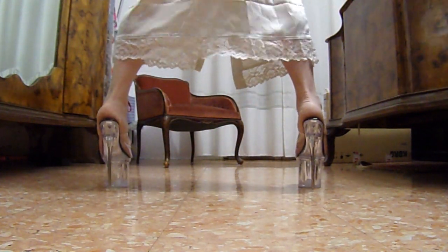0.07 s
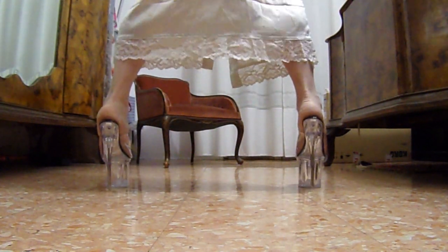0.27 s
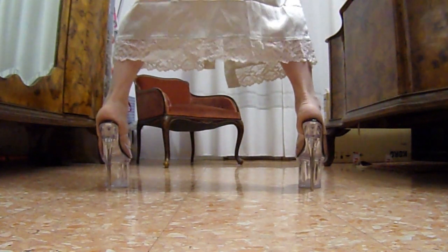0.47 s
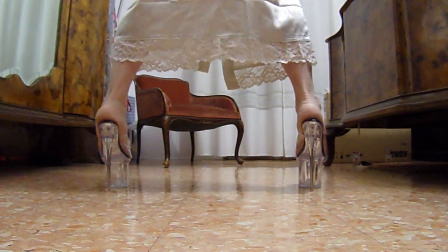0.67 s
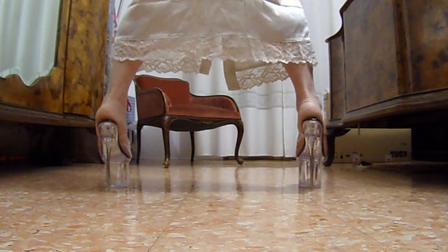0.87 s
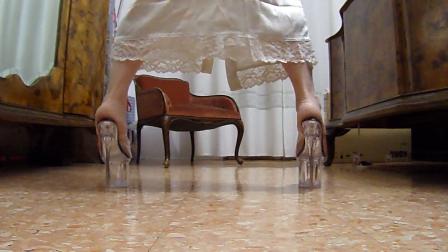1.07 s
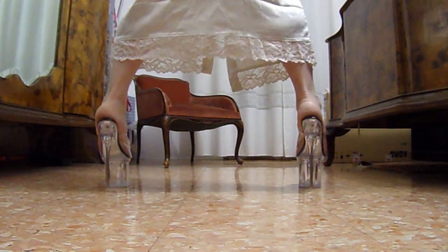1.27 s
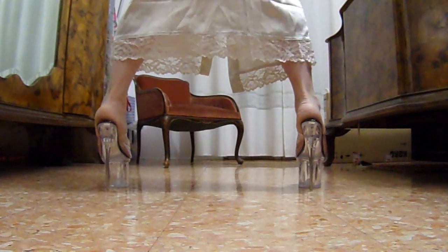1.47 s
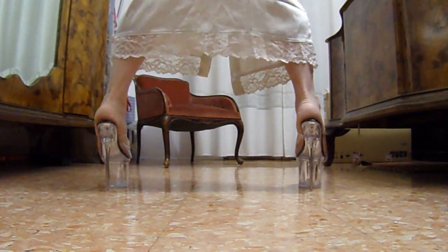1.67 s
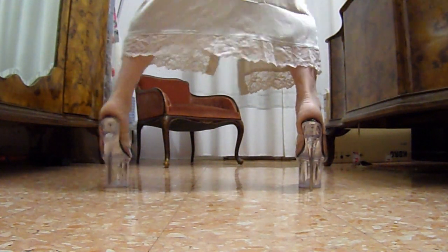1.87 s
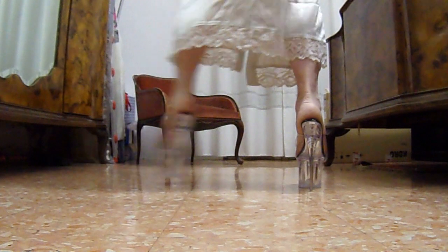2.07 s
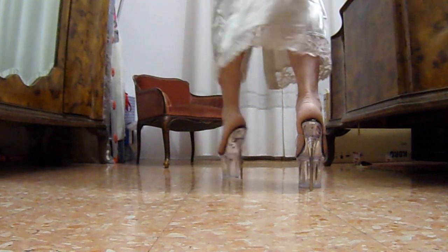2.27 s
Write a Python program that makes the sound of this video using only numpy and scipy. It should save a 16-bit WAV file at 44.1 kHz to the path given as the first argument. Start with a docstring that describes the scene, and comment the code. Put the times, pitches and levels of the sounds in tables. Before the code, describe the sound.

Quick doubled clacks of high heels on hard stone indoors, ending with a faint scuff and ticks

```python
"""A quiet room hiss, shaped noise, runs throughout. From the start two hard high heels tap a polished stone
floor in a small furnished bedroom, mostly in near-coincident pairs. Each tap sums a dull floor knock and short
heel ring (decaying sines), a noise crack, a few echo slaps and a brief boxy tail of noise and room tones.
Small ticks (double rings) sound among the taps; after the last tap one shoe slides (random grains) and
settles softly with more ticks."""
import sys
import numpy as np
from scipy import signal
from scipy.fft import rfft, irfft
from scipy.io import wavfile

SR = 44100
rng = np.random.default_rng(int(sys.argv[2]) if len(sys.argv) > 2 else 0)


def bounce(signal):
    """Save signal as a 16-bit WAV file at the path given by the first command-line argument."""
    frames = np.transpose(np.atleast_2d(signal))
    limited = np.clip(frames, -1, 1)
    pcm = np.round(limited * 32767).astype(np.int16)
    wavfile.write(sys.argv[1], SR, pcm)


N = 102753

# Microphone hiss. Each row: frequency in Hz, density in dB per Hz.
HISS_HZ_DB = [(25, -97), (80, -84), (150, -86.5), (300, -89.5), (600, -94), (1000, -99), (2000, -104),
              (4000, -108), (5000, -112), (7000, -115), (8000, -123), (9000, -116), (11800, -120),
              (13000, -117), (15500, -125)]
MIC_LOW_CUT_HZ, MIC_TOP_CUT_HZ = 130, 16400

# Taps of the brighter heel. Each row: time in seconds, level in dB, hardness as treble gain in dB.
BRIGHT_TAPS_S_DB_DB = [(-.0068, 4.5, 1), (.2171, 4.5, -1.5), (.3992, 0.5, 0.5), (.572, 0, -0.5),
                       (.7439, 0.16, -2), (.9103, 0, -1.5), (1.0413, -10.5, -17), (1.2344, 0.65, -3),
                       (1.4395, 0.4, -1.5), (1.6335, -1.8, -2)]
# Taps of the duller heel. Each row: time in seconds, level in dB, hardness as treble gain in dB.
DULL_TAPS_S_DB_DB = [(-.01, -24, -6), (.2182, -2, 2.5), (.3945, -0.4, -2.5), (.6032, -1, -2),
                     (.7303, -7.5, -3), (.8933, -5, -6.5), (1.2484, 0, -2), (1.4312, -6, -2),
                     (1.6404, -1, -4)]
HARDNESS_HZ = 1300
LEAD_S = 0.02  # headroom for taps that begin before time zero

# Knock carried by the floor. Each row: frequency in Hz, level in dB re tap, T60 in seconds.
KNOCK_HZ_DB_S = [(513, -0.5, 0.0095), (313, -16.5, 0.011)]
KNOCK_LAG_S, KNOCK_RISE_S = 0.0011, 0.0016

# Colour of the heel-tip crack. Each row: frequency in Hz, gain in dB.
CRACK_HZ_DB = [(1000, -36), (2500, -36), (5000, -46.5), (7000, -36.5), (8000, -52.5), (9800, -48.5),
               (11800, -51.5), (13500, -51.5), (16000, -46)]
CRACK_LAG_S, CRACK_T60_S, DULL_CRACK_DB = 0.0016, 0.024, 2.5

# Ring of the brighter heel. Each row: frequency in Hz, level in dB re tap, T60 in seconds.
BRIGHT_RING_HZ_DB_S = [(1000, -5.5, 0.012), (1894, -17.5, 0.032), (2564, -18.5, 0.019), (3060, -9, 0.0076),
                       (3356, -18.5, 0.011), (4050, -17.5, 0.0082), (4763, -21, 0.0095),
                       (6270, -34.5, 0.01)]
# Ring of the duller heel. Each row: frequency in Hz, level in dB re tap, T60 in seconds.
DULL_RING_HZ_DB_S = [(1300, -9.5, .012), (1646, -13, 0.019), (2860, -17, 0.01), (4140, -21, 0.0083),
                     (6620, -43, 0.0052)]
RING_LAG_S, RING_RISE_S = 0.0022, 0.0021

# Furniture and wall echoes, brighter heel. Each row: delay in seconds, level in dB re tap, frequency in Hz.
BRIGHT_ECHOES_S_DB_HZ = [(.0078, -9, 860), (.015, -8, 810), (.0204, -14.5, 900)]
# Furniture and wall echoes, duller heel. Each row: delay in seconds, level in dB re tap, frequency in Hz.
DULL_ECHOES_S_DB_HZ = [(.0064, -10.5, 1124), (.0094, -8, 710), (.0135, -12.5, 740)]
ECHO_RISE_S, ECHO_T60_S = 0.00072, 0.0083

# Base colour of the diffuse tail, both heels. Each row: frequency in Hz, gain in dB.
TAIL_HZ_DB = [(70, -44.5), (140, -23), (300, -2.5), (500, -10.5), (760, -1), (1000, -11), (1450, -15),
              (2000, -12), (2800, -17.5), (3500, -27.5), (4700, -29), (5600, -41), (7300, -42), (8000, -57),
              (9800, -46.5), (11800, -55), (13500, -51), (15800, -56)]
# Decay of the room. Each row: band centre in Hz, T60 in seconds.
ROOM_HZ_T60_S = [(100, 0.86), (260, 0.26), (700, 0.37), (1840, 0.31), (4850, 0.34), (10000, 0.39)]
# Standing tones of the room. Each row: frequency in Hz, level in dB before the heel's tail gain.
ROOM_TONES_HZ_DB = [(128, -49.5), (174, -47.5), (291, -41), (385, -42.5), (470, -38), (539, -35),
                    (654, -37), (721, -36), (760, -38), (792, -34.5), (835, -39), (885, -47), (962, -36),
                    (1137, -74), (1258, -56), (1364, -39)]
TAIL_NOISE_DB, TAIL_RISE_S = -7, 0.011
DULL_TAIL_DB, DULL_TILT_DB_PER_OCT = -2, 0.5
TAIL_CHANGE = 0.26  # power share of tail noise that differs from tap to tap

# Ticks of a heel tip or strap. Each row: time in seconds, level in dB, frequency in Hz, T60 in seconds.
TICKS_S_DB_HZ_S = [(1.106, -56, 5700, 0.0096), (1.1235, -50.5, 5250, .008), (1.125, -42, 2200, 0.016),
                   (1.126, -37.5, 1300, 0.012), (2.159, -48, 2200, 0.008), (2.201, -44, 2350, .01),
                   (2.2175, -39.5, 1930, 0.015), (2.2186, -42.5, 1250, 0.015), (2.226, -43, 2300, .01),
                   (2.231, -46, 630, 0.025)]
TICK_RISE_S, TICK_SPREAD = 0.00023, 1.276  # spread: second ring over first, frequency ratio
TICK_ROOM_DB, WALL_CUT_HZ = -3, 7900

# Sole sliding on stone. Each row: time in seconds, level in dB.
SLIDE_S_DB = [(2.03, -74), (2.08, -65.5), (2.145, -70), (2.16, -62), (2.19, -59.5), (2.225, -56.5),
              (2.27, -64), (2.33, -69)]
# Colour of the slide. Each row: frequency in Hz, relative gain in dB.
SLIDE_HZ_DB = [(400, -21), (900, -10.5), (2000, -15.5), (3300, -15.5), (4500, -23.5), (7000, -26),
               (8000, -36.5), (10000, -28.5), (15000, -35.5)]
SLIDE_GRAINS_PER_S, SLIDE_GRAIN_DB = 5300, 1.5  # dB: mean of the exponential level spread

TAP_S = 0.5
TAP_T_S = np.arange(int(TAP_S * SR)) / SR


def amp(db):
    """Convert dB to an amplitude factor."""
    return 10 ** (np.asarray(db) / 20)


def at_hz(points, hz):
    """Interpolate a (Hz, value) table along log frequency."""
    point_hz, values = np.transpose(points)
    return np.interp(np.log(np.maximum(hz, 1)), np.log(point_hz), values)


def coloured(x, points):
    """Filter a signal by a (Hz, dB) gain table in the spectrum."""
    gain = amp(at_hz(points, np.fft.rfftfreq(len(x), 1 / SR)))
    return irfft(rfft(x) * gain, len(x))


def modes(table, lag_s, rise_s, seconds):
    """Sum decaying sines that start after a lag and swell with a time constant."""
    t = np.maximum(np.arange(int(seconds * SR)) / SR - lag_s, 0)
    total = np.zeros(len(t))
    for hz, db, t60_s in table:
        total += amp(db - 60 * t / t60_s) * np.sin(2 * np.pi * hz * t)
    return (1 - np.exp(-t / rise_s)) * total


def mic_hiss():
    """Steady microphone noise: white noise scaled to unit density, then coloured."""
    return np.sqrt(SR / 2) * coloured(rng.standard_normal(N), HISS_HZ_DB)


def floor_knock():
    """Dull knock: fast-decaying floor modes."""
    return modes(KNOCK_HZ_DB_S, KNOCK_LAG_S, KNOCK_RISE_S, TAP_S)


def tip_crack(crack_db):
    """Crack of the heel tip: fresh coloured noise under an exponential decay."""
    after_s = TAP_T_S - CRACK_LAG_S
    envelope = amp(crack_db - 60 * after_s / CRACK_T60_S) * (after_s > 0)
    return envelope * coloured(rng.standard_normal(len(TAP_T_S)), CRACK_HZ_DB)


def heel_ring(ring):
    """Short bright ring: decaying modes of the heel."""
    return modes(ring, RING_LAG_S, RING_RISE_S, TAP_S)


def wall_echoes(echoes):
    """First reflections: each a short dull slap, one decaying sine."""
    return sum(modes([(hz, db, ECHO_T60_S)], delay_s, ECHO_RISE_S, TAP_S) for delay_s, db, hz in echoes)


def room_tail(white, tilt_db_per_oct):
    """Diffuse reverberation: coloured noise that dies band by band."""
    hz = np.fft.rfftfreq(len(TAP_T_S), 1 / SR)
    tilt_db = tilt_db_per_oct * np.log2(np.clip(hz / 700, 1, 8))
    tinted = rfft(white) * amp(TAIL_NOISE_DB + at_hz(TAIL_HZ_DB, hz) + tilt_db)
    tail = 0
    for k, (_, t60_s) in enumerate(ROOM_HZ_T60_S):
        # Overlapping triangular bands that sum to one.
        corners = [(f, float(j == k)) for j, (f, _) in enumerate(ROOM_HZ_T60_S)]
        band = irfft(tinted * at_hz(corners, hz), len(TAP_T_S))
        tail = tail + band * amp(-60 * TAP_T_S / t60_s)
    return tail


def room_tones():
    """Standing tones: sines at random phase, each decaying at the room's T60 there."""
    tones = np.zeros(len(TAP_T_S))
    for hz, db in ROOM_TONES_HZ_DB:
        decay = amp(db - 60 * TAP_T_S / at_hz(ROOM_HZ_T60_S, hz))
        tones += decay * np.sin(2 * np.pi * (hz * TAP_T_S + rng.random()))
    return tones


def heel(taps, ring, echoes, crack_db, tail_db, tilt_db_per_oct):
    """One heel's taps: knock, crack, ring, echoes and tail; harder contact brings more treble."""
    n = len(TAP_T_S)
    early = floor_knock() + heel_ring(ring) + wall_echoes(echoes)
    tones = room_tones()
    shared_noise = rng.standard_normal(n)
    swell = amp(tail_db) * (1 - np.exp(-(TAP_T_S / TAIL_RISE_S) ** 2))
    hardness_filter = signal.butter(1, HARDNESS_HZ, fs=SR)
    out = np.zeros(N + SR)
    for time_s, db, treble_db in taps:
        fresh_noise = rng.standard_normal(n)
        white = np.sqrt(1 - TAIL_CHANGE) * shared_noise + np.sqrt(TAIL_CHANGE) * fresh_noise
        tail = swell * (room_tail(white, tilt_db_per_oct) + tones)
        tap = early + tail + tip_crack(crack_db)
        soft = signal.lfilter(*hardness_filter, tap)
        treble = tap - soft
        out[int((time_s + LEAD_S) * SR):][:n] += amp(db) * (soft + amp(treble_db) * treble)
    return out[int(LEAD_S * SR):][:N]


def ticks():
    """Heel-tip or strap ticks: two short decaying sines each, the upper 1 dB weaker."""
    out = np.zeros(N + SR)
    for time_s, db, hz, t60_s in TICKS_S_DB_HZ_S:
        pair = [(hz, db, t60_s), (hz * TICK_SPREAD, db - 1, t60_s)]
        tick = modes(pair, 0, TICK_RISE_S, 0.05)
        out[int(time_s * SR):][:len(tick)] += tick
    return out[:N]


def small_room(x):
    """Room answer to the ticks: wall-dulled signal convolved with unit-energy decaying noise."""
    t = np.arange(SR // 3) / SR
    decay = amp(-60 * t / at_hz(ROOM_HZ_T60_S, 2000)) * (t > 0.004)
    tail = rng.standard_normal(len(t)) * decay
    dulled = signal.lfilter(*signal.butter(2, WALL_CUT_HZ, fs=SR), x)
    return signal.fftconvolve(dulled, tail / np.sqrt(np.sum(tail ** 2)))[:N]


def slide():
    """Sole sliding on stone: dense random grains of uneven level and sign, coloured."""
    hits = rng.random(N) < SLIDE_GRAINS_PER_S / SR
    grains = hits * amp(SLIDE_GRAIN_DB * rng.exponential(1, N)) * rng.choice([-1, 1], N)
    grit = coloured(grains, SLIDE_HZ_DB)
    time_s, db = np.transpose(SLIDE_S_DB)
    envelope = amp(np.interp(np.arange(N) / SR, time_s, db, left=-120))
    return envelope * grit / np.std(grit)


def scene():
    """Sum both heels, the ticks with their room answer, and the slide."""
    bright = heel(BRIGHT_TAPS_S_DB_DB, BRIGHT_RING_HZ_DB_S, BRIGHT_ECHOES_S_DB_HZ,
                  crack_db=0, tail_db=0, tilt_db_per_oct=0)
    dull = heel(DULL_TAPS_S_DB_DB, DULL_RING_HZ_DB_S, DULL_ECHOES_S_DB_HZ,
                DULL_CRACK_DB, DULL_TAIL_DB, DULL_TILT_DB_PER_OCT)
    small = ticks()
    small_wet = amp(TICK_ROOM_DB) * small_room(small)
    return (bright + dull + small + small_wet + slide())[None]


def record(dry):
    """Small microphone: drops the deep bass, adds hiss, then the top is cut."""
    low_cut = signal.butter(4, MIC_LOW_CUT_HZ, "high", fs=SR, output="sos")
    top_cut = signal.cheby2(12, 60, MIC_TOP_CUT_HZ, fs=SR, output="sos")
    lean = signal.sosfilt(low_cut, dry)
    return signal.sosfilt(top_cut, lean + mic_hiss())


dry = scene()
out = record(dry)
bounce(out)
```